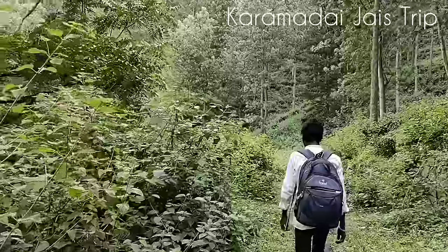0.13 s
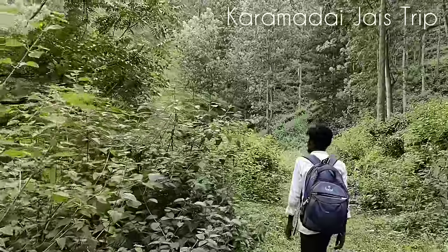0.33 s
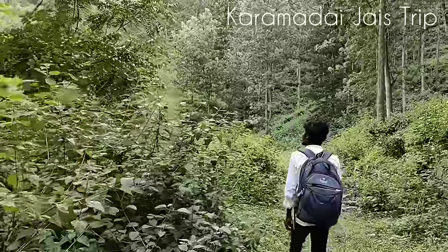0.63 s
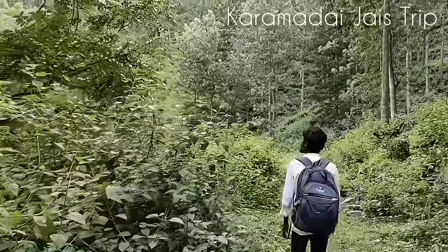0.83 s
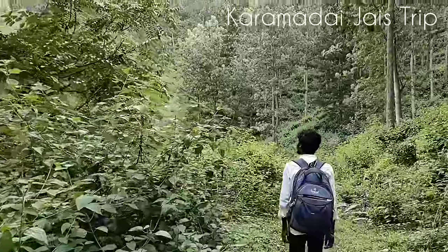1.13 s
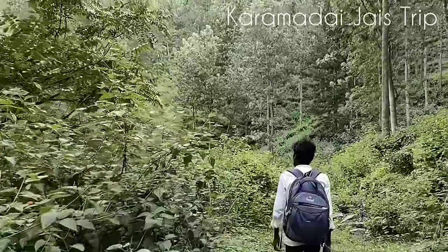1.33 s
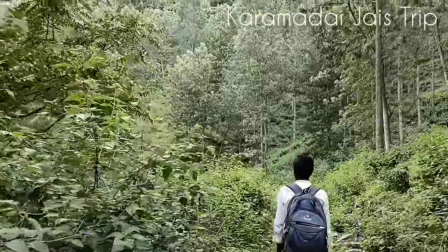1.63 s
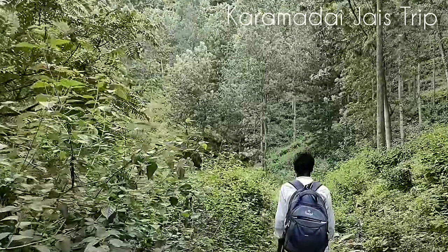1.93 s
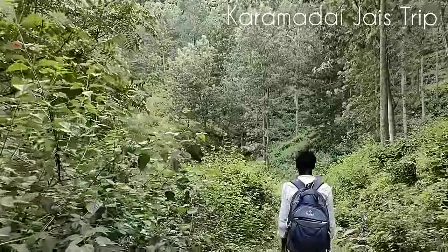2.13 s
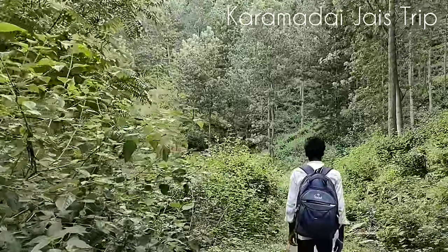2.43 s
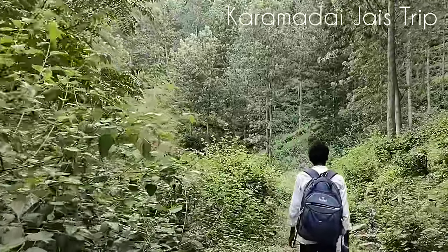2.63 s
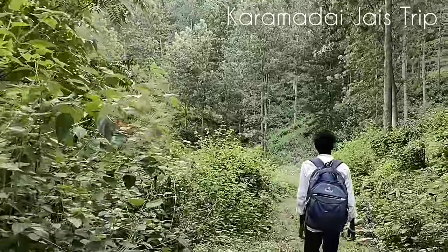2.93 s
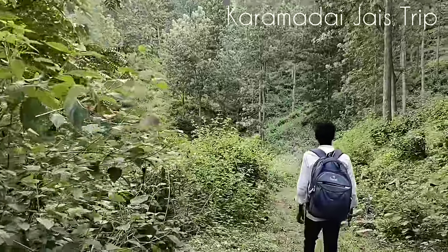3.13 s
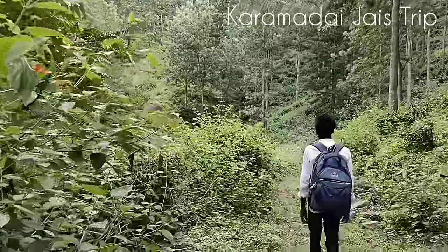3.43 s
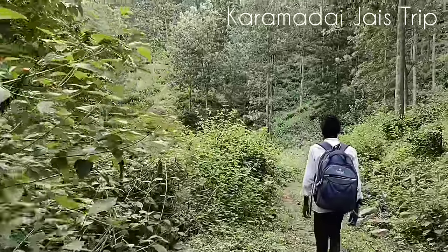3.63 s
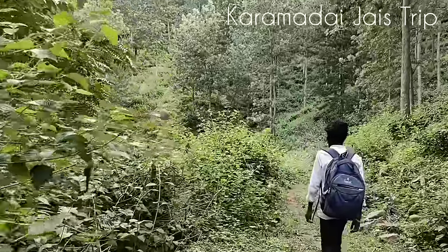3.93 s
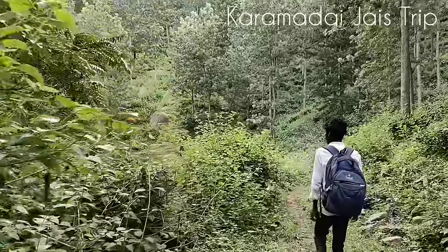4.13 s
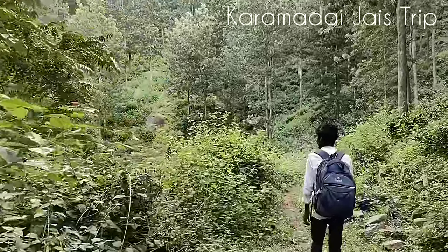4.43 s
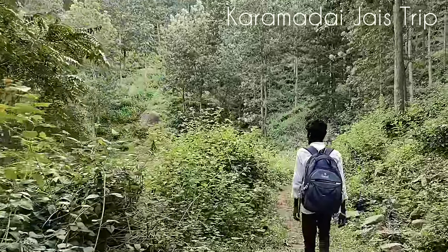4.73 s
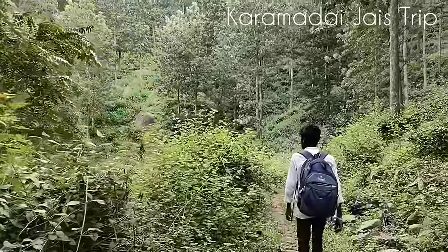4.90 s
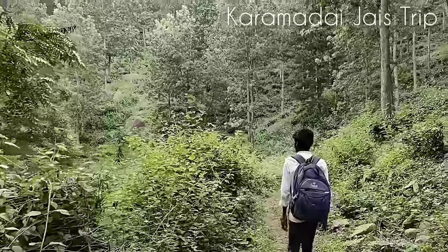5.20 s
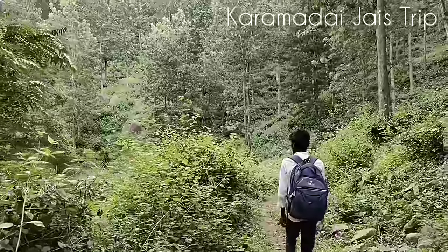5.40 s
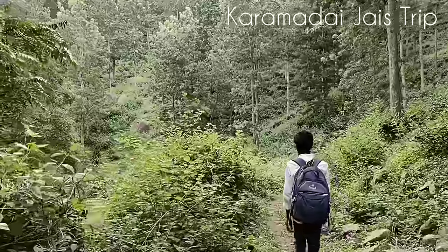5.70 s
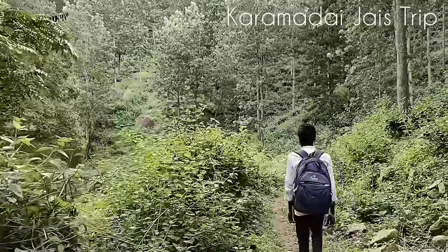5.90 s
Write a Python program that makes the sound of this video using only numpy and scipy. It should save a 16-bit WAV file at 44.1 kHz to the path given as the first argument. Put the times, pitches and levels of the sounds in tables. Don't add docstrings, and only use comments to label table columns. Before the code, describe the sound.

A phone microphone follows a walker on a hard dirt forest trail, its suppressor leaving patchy scraps and silences. After a mute start, faint chirps and coos appear at 0.1-0.5 s with low wind bumps. A heel thud at 0.7 leads to a twig snap and crunch at 0.75. Leaf scraps brush at 1.25-1.35; blurred high chirps follow at 1.6-1.8. A sharp step lands at 1.9, another at 2.5, as deep wind buffeting peaks around 2.5-2.9, with a thin insect tone and rising whistle. Strong snaps come at 3.04 and 3.63, with a light scuff at 3.3. Wind dies near 3.9. A crisp double step crunches at 4.17-4.26, then chirps and a rising whistle sound to 4.8. A faint scuff at 4.86 precedes silence from 5.0. A short snap and thud hit at 5.31; coos, insect and chirps follow, with a faint step at 6.02.

```python
import sys
import numpy as np
from scipy import signal
from scipy.fft import rfft, irfft
from scipy.io import wavfile
from scipy.ndimage import uniform_filter1d

SR = 44100
rng = np.random.default_rng(int(sys.argv[2]) if len(sys.argv) > 2 else 0)


def rack_gain(trim_db):
    fader = np.asarray(trim_db, float)
    return 10 ** (fader / 20)


def pcm_store(signal):
    levels = np.round(np.clip(np.atleast_2d(signal), -1, 1) * 32767)
    wavfile.write(sys.argv[1], SR, levels.astype(np.int16).T)


N = 267157

# frequency in Hz, level in dB per Hz.
LITTER_SPECTRUM = [(150, -38.5), (250, 3.5), (830, -14), (999, -3.5), (1170, -7.5), (1700, 1.5), (1960, 0),
                   (2960, -12), (4420, -19), (4740, -15.5), (5880, -6.5), (7080, -26), (7600, -58.5),
                   (9880, -69), (16700, -120)]

# low edge in Hz, high edge in Hz, delay in s, then the
# modes, each with frequency in Hz, level in dB, t60 in s.
ZONES = [
    (3750, 4800, .0004, [(4000, -2, 0.00031), (4250, 4, 0.0028)]),
    (4800, 7000, 0.00016, [(5550, -0.5, 0.0036), (6800, -5, 0.0051)]),
    (1480, 2700, 0.00085, [(1840, -2, 0.0051), (2440, -6, 0.0051)]),
    (1040, 1500, 0.0013, [(1195, 2, 0.024), (1408, -8, 0.013)]),
    (291.8, 910, 0.0014, [(357.3, -3.5, 0.033), (520, 3, 0.017), (706, -12.5, .02)]),
]


def unit(x):
    return x / np.sqrt(np.mean(x ** 2) + 1e-30)


def shaped_noise(count, gain_at):
    hz = np.maximum(np.fft.rfftfreq(count, 1 / SR), 1)
    spectrum = rfft(rng.standard_normal(count)) * gain_at(hz)
    return unit(irfft(spectrum, count))


def colour(points):
    hz_at, db_at = np.transpose(points)
    return lambda hz: rack_gain(np.interp(np.log(hz), np.log(hz_at), db_at, left=-90, right=-90))


def hump(centre_hz, width_hz, steep):
    return lambda hz: 1 / (1 + np.abs(2 * (hz - centre_hz) / width_hz) ** steep)


def streaks(count):
    ridges_db = rng.normal(0, 4, size=count)
    return lambda hz: rack_gain(np.interp(hz, np.linspace(0, 8000, count), ridges_db))


def band(x, low_hz, high_hz):
    return signal.sosfilt(signal.butter(3, [low_hz, high_hz], "band", fs=SR, output="sos"), x)


def add(out, s, piece):
    i = max(round(s * SR), 0)
    out[i:i + len(piece)] += piece[:N - i]


def soft_ends(count, rise_s, fall_s):
    t = np.arange(count) / SR
    return np.clip(np.minimum(t / rise_s, (t[-1] - t) / fall_s), 0, 1) ** 2


def struck(modes, t):
    chance = rng.normal(0, [2, .012], (len(modes), 2))
    ring = 0
    for (hz, db, t60), (extra_db, detune) in zip(modes, chance):
        decay = rack_gain(db + extra_db - 60 * t / t60)
        ring = ring + decay * np.sin(2 * np.pi * hz * (1 + detune) * t)
    return ring


def song(notes, waver_hz, flutter_db, smear_db, smear_hz):
    out = np.zeros(N)
    for rows in notes:
        s, hz, db = np.transpose(rows)
        t = np.arange(s[0], s[-1], 1 / SR)
        pitch = np.interp(t, s, hz) + waver_hz * shaped_noise(len(t), hump(0, 100, 3.4))
        phase = 2 * np.pi * np.cumsum(pitch) / SR
        flutter = rack_gain(flutter_db * shaped_noise(len(t), hump(0, 91, 6)))
        clear = np.sqrt(2) * np.sin(phase) * flutter
        smear = rack_gain(smear_db) * np.cos(phase) * shaped_noise(len(t), hump(0, smear_hz, 5.5))
        level = rack_gain(uniform_filter1d(np.interp(t, s, db), size=500))
        add(out, s[0], level * soft_ends(len(t), 0.0058, 0.0048) * (clear + smear))
    return out


def hush():
    # time in s, level in dB.
    leak = [(0.099, -85), (0.27, -77.5), (0.54, -74.5), (1.0, -79.5), (1.62, -74), (1.96, -71),
            (3.25, -71.5), (3.6, -79), (4.07, -82), (4.249, -80.5), (4.69, -75), (5.0, -85), (5.47, -70.5),
            (6.06, -70.5)]
    # frequency in Hz, level in dB per Hz.
    hush_spectrum = [(200, 0), (500, -6.5), (1500, -5), (3000, -7.5), (4000, -5), (6000, -8.5), (7000, -12)]
    s, db = np.transpose(leak)
    level = rack_gain(np.interp(np.arange(N) / SR, s, db) - 14.5)
    return level * shaped_noise(N, colour(hush_spectrum))


def wind():
    # peak in s, rumble in dB, rise in s, fall in s, flutter against rumble in dB.
    # Rise and fall each take 30 dB.
    gust_rows = [(0.148, -26, 0.025, 0.35, -14), (0.27, -43, 0.16, .12, -7.5),
                 (0.441, -28.5, 0.17, 0.17, -17.5), (0.56, -43.5, .1, 0.071, -25),
                 (0.7, -45, 0.062, 0.13, -26), (0.86, -54, .2, 0.09, -25.5), (0.98, -56, .06, 0.11, -25.5),
                 (1.17, -62.5, .05, 0.083, -24), (1.331, -33, 0.02, 0.46, -14), (1.47, -25, 0.13, 0.073, 2),
                 (1.58, -39, .1, 0.094, -20.5), (1.749, -30, 0.078, 0.17, -11.5),
                 (1.839, -26, 0.066, 0.043, -28.5), (2.09, -23.5, 0.36, 0.098, -18),
                 (2.21, -25, 0.12, 0.11, -6), (2.27, -18, 0.15, 0.2, -14), (2.48, -16, 0.26, 0.48, -6.5),
                 (2.732, -18.5, 0.18, 0.16, 1), (2.82, -14, 0.097, .35, -11.5),
                 (3.05, -20, 0.093, 0.077, 2), (3.281, -32, 0.62, 0.1, -25.5), (3.55, -39, 0.07, 0.22, -29),
                 (3.701, -24, 0.35, 0.13, -13.5), (4.07, -67, .05, 0.085, -20.5),
                 (4.228, -62, 0.025, 0.12, 32.5), (4.5, -74, 1.6, 1.5, -12.5),
                 (4.47, -64.5, .06, .06, -14.5), (4.878, -68, 0.024, 0.084, 23),
                 (4.94, -63, .1, 0.079, -20), (5.38, -56, .03, 0.048, 10), (5.48, -55.5, 0.44, 1, -14),
                 (5.789, -39.5, 0.077, 0.038, -23), (5.62, -50, .1, .1, -26),
                 (5.87, -38.5, .04, 0.037, -23), (5.971, -44.5, 0.29, 0.21, -33.5)]
    # time in s, swing in dB, quickness in Hz.
    buffets = [(0.1692, -26, 89.1), (0.255, -28, 85), (0.4422, -24, 63.5), (1.4893, -20, 100),
               (1.474, -22, 90), (1.508, -26, 100), (1.838, -24, 55), (2.207, -22, 105), (2.3, -23, 75),
               (2.358, -24, 65), (1.7541, -21.5, 79), (1.7796, -30.5, 26.1), (1.9226, -23, 63.5),
               (2.091, -15.5, 77.5), (2.1697, -18.5, 83.3), (2.2825, -14.5, 98.8), (2.4889, -16, 95.1),
               (2.5335, -13, 95.7), (2.6912, -10, 97.1), (2.715, -12.5, 98.8), (2.7402, -10.5, 147),
               (2.812, -10, 73.1), (2.8458, -14.5, 99.3), (2.8963, -11.5, 70.4), (2.557, -19, 80.5),
               (2.578, -20.5, 80.7), (2.939, -24.5, 70), (3.049, -21.5, 110), (3.13, -28, 59),
               (3.711, -23, 72), (3.7324, -28, 64), (5.9625, -39, 55.1)]
    t = np.arange(N) / SR
    flutter_quicker = 1.6
    rumble_gain = flutter_gain = rack_gain(-96.5)
    for at, db, rise_s, fall_s, flutter_db in gust_rows:
        down_db = -30 * np.maximum((at - t) / rise_s, (t - at) / fall_s)
        rumble_gain = np.maximum(rumble_gain, rack_gain(db + down_db))
        flutter_gain = np.maximum(flutter_gain, rack_gain(db + flutter_db + flutter_quicker * down_db))
    rumble_gain, flutter_gain = uniform_filter1d([rumble_gain, flutter_gain], size=900)

    rumble = shaped_noise(N, colour([(8, -27.0), (25, 1.0), (45, 1.5), (75, -6.5), (110, -22.0)]))
    flutter = shaped_noise(N, colour([(50, -24.5), (80, 0.0), (120, -6), (170, -15.0), (230, -34), (320, -64.5)]))
    out = rack_gain(-5.5) * rumble_gain * rumble + rack_gain(-6) * flutter_gain * flutter
    out = signal.sosfilt(signal.butter(6, 300, fs=SR, output="sos"), out)

    near = np.arange(-SR // 20, SR // 20) / SR
    for at, db, hz in buffets:
        phase = 3.985 * hz * near
        push_pull = -rack_gain(db + 2.5) * phase * np.exp(-phase ** 2 / 2)
        add(out, at - 1 / 20, push_pull)
    return signal.sosfilt(signal.butter(2, 22, "high", fs=SR, output="sos"), out)


def gate():
    # start in s, length in s.
    mutes = [
        (0.0, 0.072),
        (.605, 0.032),
        (1.045, 0.11),
        (1.24, 0.02),
        (3.365, 0.12),
        (3.94, 0.075),
        (5.0, 0.31),
    ]
    t = np.arange(N) / SR
    closed = sum(1.0 * (t >= s) * (t < s + length) for s, length in mutes)
    return 1 - uniform_filter1d(closed, size=1300)


def scraps():
    # start in s, length in s, centre in Hz, width in Hz, start level in dB. #
    # Brushed leaves and stems, dying away into the background, plus one short chirp at 4.435 s.
    rustles = [(0.4335, 0.075, 548, 234, -46.5), (0.655, 0.087, 1385, 280, -56.5),
               (0.798, 0.14, 4196, 180, -58.5), (1.241, 0.036, 2695, 400, -56.5),
               (1.258, 0.07, 2840, 900, -47), (1.256, 0.25, 2480, 3560, -65.5),
               (1.2576, 0.043, 2010, 355, -53.5), (1.304, 0.053, 1370, 504, -47),
               (1.3402, 0.12, 1333, 437, -60), (1.3409, 0.16, 2020, 255, -58),
               (1.346, 0.082, 3192, 1910, -50), (2.562, 0.068, 730, 300, -60.5),
               (4.3, 0.088, 290, 150, -54.5), (0.799, 0.089, 565, 299, -49),
               (5.776, 0.29, 1140, 300, -82.5), (2.3771, 0.035, 2640, 282, -61.5),
               (3.301, 0.066, 5090, 2700, -45), (3.6783, 0.093, 947, 233.4, -52.5),
               (4.064, 0.069, 1345, 348, -45.5), (4.435, 0.076, 4140, 600, -49.5),
               (4.861, 0.057, 6430, 1500, -56.5), (4.864, 0.074, 2100, 1200, -60),
               (4.859, 0.078, 410, 556, -43.5), (4.094, 0.04, 6400, 904, -68.5),
               (4.189, 0.15, 6060, 1997, -45.5), (4.227, 0.17, 4960, 2600, -40),
               (4.764, 0.075, 1507, 609, -52.5), (5.36, 0.25, 5150, 900, -66), (5.385, 0.14, 330, 248, -55),
               (5.385, 0.16, 6200, 1800, -65), (5.385, 0.068, 3820, 1310, -59.5),
               (5.525, 0.066, 680, 350, -60.5), (5.956, 0.047, 600, 400, -70.5),
               (0.377, 0.066, 590, 253, -63), (0.759, 0.11, 1800, 800, -38.5), (0.75, 0.1, 3230, 1500, -47),
               (1.907, 0.082, 3220, 905, -52.5), (3.043, 0.06, 3250, 700, -58.5),
               (3.632, 0.084, 2950, 1200, -54.5), (2.081, 0.055, 520, 300, -70),
               (4.765, 0.042, 400, 250, -68), (6.017, 0.09, 5050, 1889, -43),
               (4.854, 0.085, 4150, 1296, -54), (5.4377, 0.096, 478, 804, -52)]
    tweets = [(0.081, 0.12, 4026, 979, -57), (0.198, 0.15, 3356, 905, -55),
              (1.614, 0.11, 5130, 2000, -41.5), (1.751, 0.13, 5766, 1496, -39.5),
              (1.818, 0.086, 4160, 677, -43), (1.87, 0.16, 5576, 340, -62.5), (3.525, 0.12, 3144, 600, -65),
              (3.563, 0.18, 3820, 788.5, -55), (4.027, 0.14, 3470, 520, -51.5),
              (4.118, 0.057, 6230, 1300, -46), (4.376, 0.12, 5820, 1487, -45),
              (4.385, 0.1, 2400, 452.3, -59.5), (4.641, 0.08, 3700, 762, -49),
              (5.59, 0.15, 4216, 696.4, -54.5), (5.735, 0.15, 4294, 790, -58),
              (5.741, 0.12, 2420, 593, -50.5), (5.84, 0.24, 2330, 500, -69.5),
              (5.9589, 0.059, 3190, 401, -60), (5.9624, 0.056, 5100, 1800, -43)]
    drones = [(0.884, 0.03, 516, 199, -62), (1.2507, 0.071, 1376, 622, -66.5),
              (1.2963, 0.055, 2940, 934, -54), (1.512, 0.15, 6700, 303, -73), (2.404, 0.14, 1513, 268, -71),
              (3.6954, 0.059, 481, 316.6, -56.5), (3.8691, 0.051, 2786, 587, -50.5),
              (4.517, 0.12, 3686, 615, -52), (4.6424, 0.171, 2616, 601, -63), (5.618, 0.14, 2994, 645, -56),
              (5.765, 0.052, 2930, 2150, -50), (0.499, 0.075, 2540, 347, -79.5),
              (2.768, 0.16, 2620, 301, -56.5), (2.76, 0.06, 2350, 250, -65.5),
              (2.89, 0.02, 3050, 200, -62.5), (4.675, 0.065, 3130, 250, -61.5),
              (4.71, 0.039, 1480, 300, -78), (5.835, 0.081, 2940, 497, -72.5), (1.69, .07, 5100, 1700, -64),
              (1.575, .05, 6100, 700, -68), (4.68, .105, 3600, 650, -57)]
    fading = [(*row, 0.9 * (-90.5 - row[-1]), False) for row in rustles]
    fading += [(*row, -23, True) for row in tweets]
    fading += [(*row, 0.5, True) for row in drones]
    fall_s_per_hz = 12e-6
    out = np.zeros(N)
    for s, length, centre_hz, width_hz, db, fade_db, is_call in fading:
        count = round((max(length, .01) + 0.019) * SR)
        fade = rack_gain(db + fade_db * np.arange(count) / SR / length)
        level = fade * soft_ends(count, 0.012, 0.038)
        rough = rack_gain(2.5 * shaped_noise(count, hump(0, 160, 2)))
        zone = hump(centre_hz, 0.6 * width_hz, 4.6 if is_call else 5.6)
        ridges = streaks(count=70)
        piece = level * rough * shaped_noise(count, lambda hz: zone(hz) * ridges(hz))

        size = count + SR // 10
        below = np.fft.rfftfreq(size, 1 / SR) - centre_hz - width_hz
        slides = is_call and centre_hz > 2700 and length > .085
        lag = fall_s_per_hz * slides
        swept = irfft(rfft(piece, size) * np.exp(1j * np.pi * lag * below ** 2), size)
        add(out, s - .004 - 0.69 * lag * width_hz, swept)
    return out


def ticks():
    # time in s, frequency in Hz, level in dB, t60 in s.
    tick_rows = [(0.752, 3270, -43.5, 0.0057), (1.9063, 3310, -31, .005), (3.0405, 3220, -33, .005),
                 (3.6282, 2940, -20, .005), (4.171, 3300, -33, .005), (4.068, 2080, -64, 0.053),
                 (3.582, 600, -62, 0.024), (0.082, 4000, -41, .03), (1.262, 2763, -36, 0.033),
                 (1.262, 1980, -52, .02), (1.347, 2660, -39, 0.013), (1.347, 1340, -53, .03),
                 (1.347, 3570, -45.5, 0.017), (1.346, 1910, -50, .04), (3.305, 5250, -32, .008),
                 (4.237, 4250, -47, 0.035), (0.666, 1420, -59, .05), (3.303, 564, -36.5, .04),
                 (3.304, 1220, -45.5, 0.061), (4.26, 500, -40.5, 0.033), (4.263, 1810, -38.5, 0.017),
                 (4.861, 1190, -39, 0.05), (4.86, 2210, -38, 0.016), (4.862, 4140, -39.5, 0.02),
                 (5.348, 4100, -46, 0.012), (5.347, 435, -53, .025), (5.347, 1250, -51, 0.027),
                 (5.374, 444, -31.5, 0.028), (6.0192, 5250, -27, 0.015), (6.0195, 3750, -48, .015),
                 (5.966, 5100, -46, .015), (5.977, 5200, -44, .015), (2.38, 3700, -56, .025),
                 (2.38, 1550, -60, .025)]
    out = np.zeros(N)
    t = np.arange(round(SR / 10)) / SR
    for s, hz, db, t60 in tick_rows:
        soft_onset = 1 - np.exp(-t * hz / 3.5)
        pair = [(hz, db, t60), (1.048 * hz, db - 19, 0.34 * t60)]
        add(out, s, soft_onset * struck(pair, t))
    return out


def birds():
    # time in s, frequency in Hz, level in dB.
    whistle = [
        [(2.701, 2301, -70.5), (2.728, 2400, -48), (2.76, 2420, -56), (2.77, 2600, -57), (2.785, 2680, -37),
         (2.826, 2790, -41), (2.89, 2830, -44), (2.961, 2701, -76.5)],
        [(2.976, 2830, -85), (2.991, 2840, -65), (3.03, 2840, -68), (3.091, 2760, -65.5)],
        [(4.611, 2410, -82), (4.657, 2540, -50.5), (4.672, 2730, -63), (4.691, 2710, -54.5)],
    ]
    held = [
        [(4.68, 2774, -66.5), (4.705, 2894, -41.5), (4.766, 2896, -44), (4.822, 2920, -81.5),
         (4.868, 2880, -67), (4.92, 2943, -99.5)],
    ]
    chirps = [
        [(1.617, 6470, -41.5), (1.63, 4800, -59), (1.655, 4400, -62)],
        [(1.76, 6300, -54), (1.777, 5680, -37), (1.81, 5680, -54), (1.835, 5300, -58)],
        [(4.38, 6200, -65.5), (4.4, 5813, -46.5), (4.44, 5723, -57.5), (4.5, 5630, -56.5), (4.515, 5700, -90.5),
         (4.545, 5720, -75), (4.57, 5630, -93)],
        [(3.56, 3900, -63), (3.59, 3845, -50), (3.65, 3820, -59.5), (3.73, 3910, -82.5)],
        [(5.612, 3080, -66.5), (5.645, 2970, -46.5), (5.7, 2863, -60.5), (5.75, 2824, -57)],
        [(0.084, 4250, -62), (0.1, 4006, -62), (0.13, 3630, -66)],
        [(4.52, 3900, -60), (4.56, 3705, -53), (4.62, 3500, -58.5)],
        [(0.2, 3083, -63), (0.215, 3200, -57), (0.24, 3500, -64.5)],
    ]
    return song(whistle + held + chirps, waver_hz=16, flutter_db=2.5, smear_db=-16.5, smear_hz=400)


def insect():
    # start in s, length in s, level in dB, fade in dB.
    bouts = [
        (0.115, 0.47, -68.5, -13.5),
        (1.288, 0.26, -82, -14),
        (1.631, 0.36, -65, -8.5),
        (1.982, 0.43, -86.5, -0.5),
        (2.46, 0.41, -54, -23.5),
        (5.395, 0.24, -80.5, 0),
        (5.585, 0.16, -54.5, -9.5),
        (5.73, 0.18, -53.5, -19),
        (5.898, 0.19, -73.5, 4),
    ]
    rise_s, rise_db = 0.035, 26.5
    lines = [(4309, 0), (4450, -18)]   # Hz, dB; a fainter line rides above
    notes = []
    for s, length, db, fade_db in bouts:
        for hz, side_db in lines:
            peak_db = db + side_db
            notes.append([(s, hz, peak_db - rise_db), (s + rise_s, hz, peak_db), (s + length, hz, peak_db + fade_db)])
    return song(notes, waver_hz=4, flutter_db=2.5, smear_db=-12, smear_hz=60)


def coos():
    # start in s, length in s, frequency in Hz, level in dB, share spent swelling from 0 to 1.
    coo_rows = [
        (0.192, 0.12, 890, -53.5, 0.47),
        (0.362, 0.068, 851, -45, 0.55),
        (0.425, 0.045, 831, -59, 0.35),
        (0.454, 0.12, 927, -47, .35),
        (5.37, 0.22, 933, -64.5, 0.1),
        (5.536, 0.25, 925, -58.5, 0.09),
        (2.047, 0.08, 1184, -70, 0.78),
        (4.564, 0.032, 878, -89.5, 0.74),
    ]
    notes = []
    for s, length, hz, db, peak_at in coo_rows:
        peak_s = s + np.clip(peak_at, .05, .95) * length
        notes.append([(s, hz, db - 25), (peak_s, hz, db), (s + length, hz, db - 35)])
    return song(notes, waver_hz=2.7, flutter_db=4.0, smear_db=-3.0, smear_hz=120)


def thuds():
    # time in s, level in dB, pitch 1 ms after the jolt in Hz, t60 in s.
    jolts = [
        (0.6863, -25, 260.5, 0.18),
        (1.908, -23, 194, 0.055),
        (3.0388, -24.5, 200, 0.15),
        (3.628, -24.5, 250.2, 0.11),
        (4.17, -21, 277, 0.071),
        (4.223, -28, 270, 0.07),
        (5.31, -24, 280, 0.035),
        (5.454, -36, 146, 0.12),
        (6.016, -41, 265, 0.045),
    ]
    out = np.zeros(N)
    t = np.arange(round(SR / 10)) / SR
    for s, db, hz, t60 in jolts:
        turns = hz * 0.0028 * np.log(1 + t / .0018)
        onset = 1 - np.exp(-(t / 0.0018) ** 2)
        add(out, s, rack_gain(db - 60 * t / t60) * onset * np.sin(2 * np.pi * turns))
    return signal.sosfilt(signal.butter(4, 650, fs=SR, output="sos"), out)


def snaps():
    # time in s, twig crack in dB, crispness in dB, sole slap in dB, heel knock in dB.
    snap_rows = [(0.7527, -27.5, 2.5, -29, -31), (1.906, -19, 0, -20, -23),
                 (2.4828, -22.5, 3.5, -25, -26.5), (3.0384, -15, 1.5, -13.5, -17.5),
                 (3.305, -59, 2.5, -56.5, -42), (3.6283, -14, -2, -24, -27),
                 (4.1705, -15.5, 0.5, -25.5, -28), (4.1735, -19, -2, -20, -42),
                 (4.2217, -47.5, 25, -34, -28.5), (4.2612, -59, -13, -59.5, -35.5),
                 (4.8612, -48.5, 3, -52, -41.5), (5.3091, -23.5, -4, -45.5, -31.5),
                 (6.0184, -57.5, 1, -70, -37)]
    out = np.zeros(N)
    t = np.arange(round(SR / 10)) / SR
    for s, crack_db, crisp_db, slap_db, knock_db in snap_rows:
        grit_db = (slap_db + knock_db) / 2 - 7
        levels_db = crack_db, crack_db + crisp_db, slap_db, grit_db, knock_db
        for level_db, (low_hz, high_hz, late_s, modes) in zip(levels_db, ZONES):
            add(out, s + late_s, rack_gain(level_db) * band(struck(modes, t), low_hz, high_hz))
        onset = shaped_noise(300, colour(LITTER_SPECTRUM)) * np.linspace(0, 1, 300) ** 2
        add(out, s - 250 / SR, rack_gain(crack_db - 30) * onset)
    return out


def crunches():
    # time in s, dry leaves in dB, crispness in dB, twigs in dB, soil in dB.
    settling = [(0.756, -33.5, -9.5, -32, -23.5), (1.9045, -25.5, -2, -29.5, -27.5),
                (2.4818, -24.5, -6, -16, -21), (3.038, -30, -5, -28, -31.5),
                (3.3061, -68.5, 2.5, -55, -45.5), (3.628, -28.5, -11.5, -36, -30),
                (4.17, -28, -0.5, -44, -30.5), (4.2229, -28.5, 4, -40.5, -29),
                (4.2596, -35.5, 5.5, -48, -29.5), (4.8564, -60, -6, -62, -51),
                (5.3074, -34, -8.5, -47, -23.5), (5.345, -46, -18, -83.5, -39.5),
                (6.0173, -56, -4.5, -83, -31.5)]
    zone_t60 = [
        0.098,
        0.14,
        0.11,
        0.14,
        .12,
    ]
    out = np.zeros(N)
    t = np.arange(round(SR / 5)) / SR
    for s, leaf_db, crisp_db, twig_db, soil_db in settling:
        grit_db = (twig_db + soil_db) / 2 - 6.5
        levels_db = leaf_db, leaf_db + crisp_db, twig_db, grit_db, soil_db
        patches = streaks(count=50)
        for level_db, t60, (low_hz, high_hz, *_) in zip(levels_db, zone_t60, ZONES):
            zone = hump((low_hz + high_hz) / 2, 0.95 * (high_hz - low_hz), 8)
            litter = shaped_noise(len(t), lambda hz: colour(LITTER_SPECTRUM)(hz) * patches(hz) * zone(hz))
            grains = rack_gain(4.5 * shaped_noise(len(t), hump(0, 400, 2)))
            swell = (1 - np.exp(-t / 0.0015)) * rack_gain(-60 * (t / (1.053 * t60)) ** 1.57)
            add(out, s, rack_gain(level_db - 23.0) * swell * grains * litter)
    return out


def suppressor(x):
    background_db = -94
    cells = signal.stft(x, nperseg=512, noverlap=384)[2]
    power = uniform_filter1d(np.abs(cells) ** 2, size=5, axis=0)
    power = uniform_filter1d(power, size=3, axis=1)
    gain = (power / (power + rack_gain(2 * background_db))) ** 2
    return signal.istft(cells * gain, nperseg=512, noverlap=384)[1][:N]


def scene():
    air = gate() * (hush() + wind())
    passed = suppressor(scraps() + ticks() + snaps() + crunches())
    return (air + passed + birds() + insect() + coos() + thuds())[None]


def roll_off(x):
    return signal.sosfilt(signal.butter(12, 15700, fs=SR, output="sos"), x)


def record(dry):
    band_top_hz, grain_db = 7000, -94.5
    narrow = signal.sosfilt(signal.cheby2(16, 64, band_top_hz * 1.09, fs=SR, output="sos"), dry)
    is_open = np.clip(uniform_filter1d(np.abs(narrow), 2001) / rack_gain(-72), 0, 1)
    noisy = narrow + rack_gain(grain_db) * is_open * rng.standard_normal(dry.shape)
    return roll_off(noisy)


dry = scene()
out = record(dry)
pcm_store(out)
```